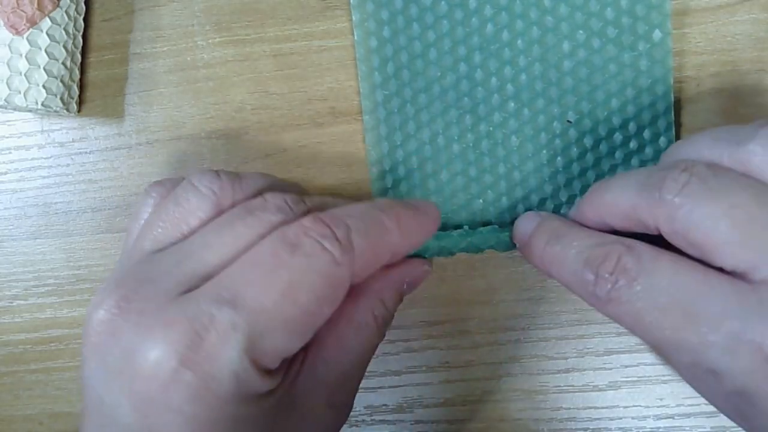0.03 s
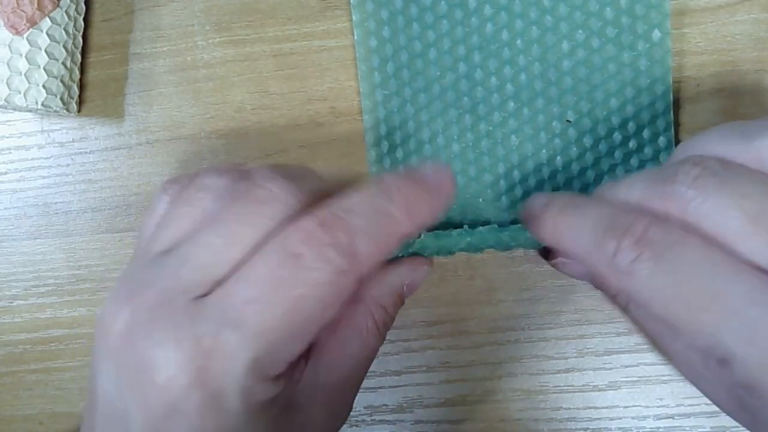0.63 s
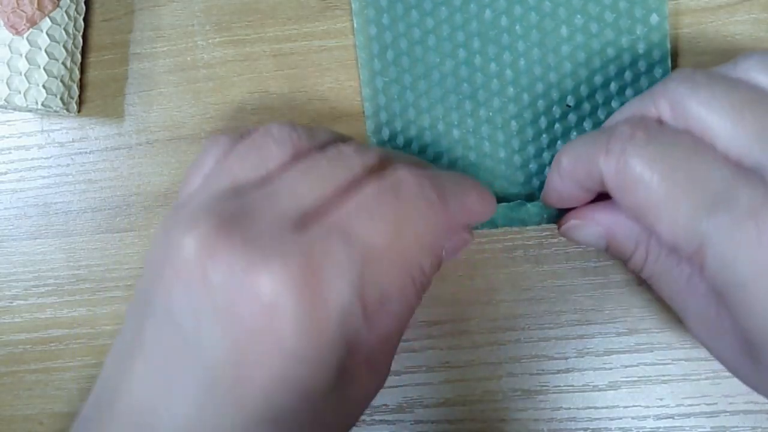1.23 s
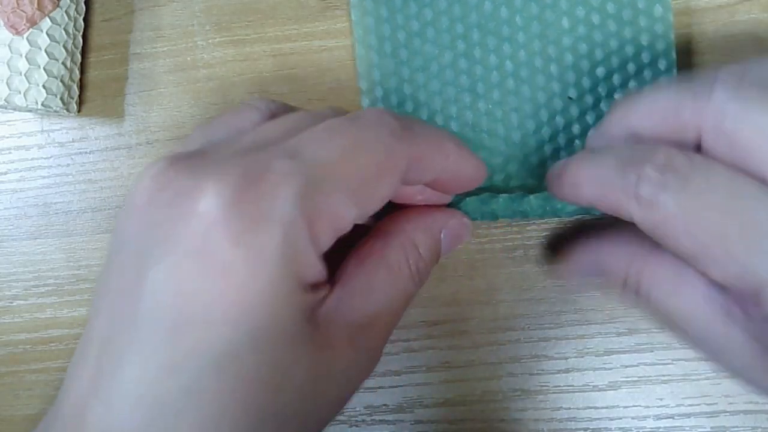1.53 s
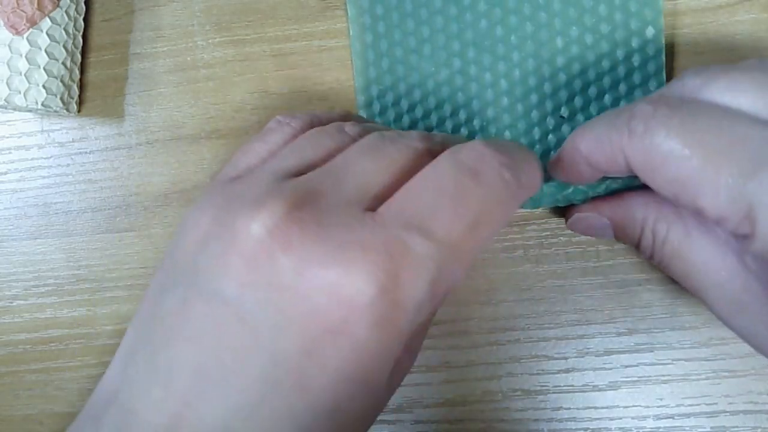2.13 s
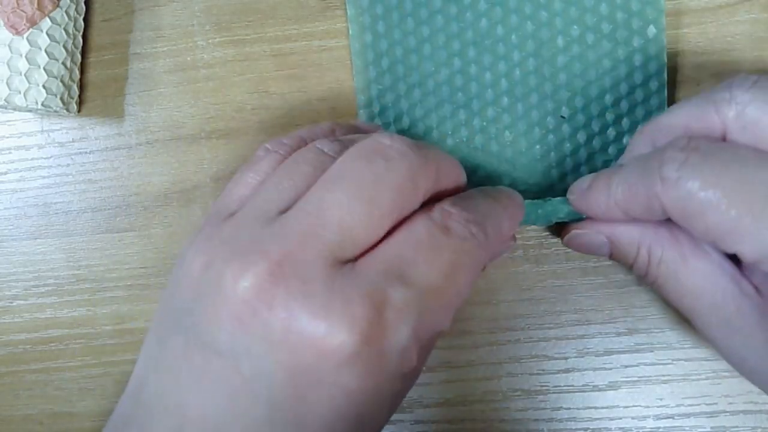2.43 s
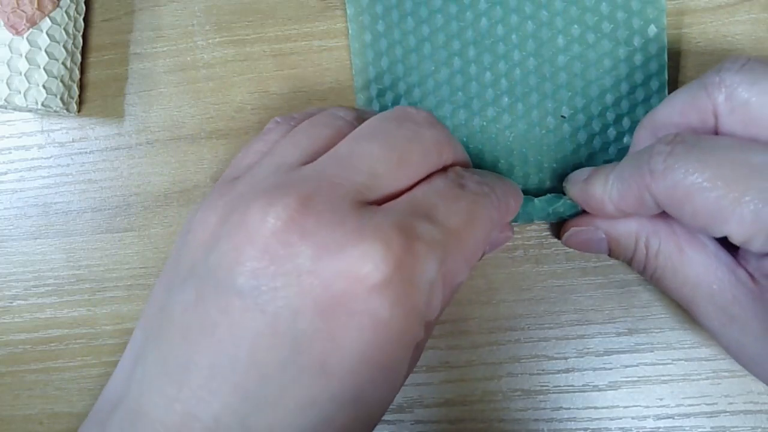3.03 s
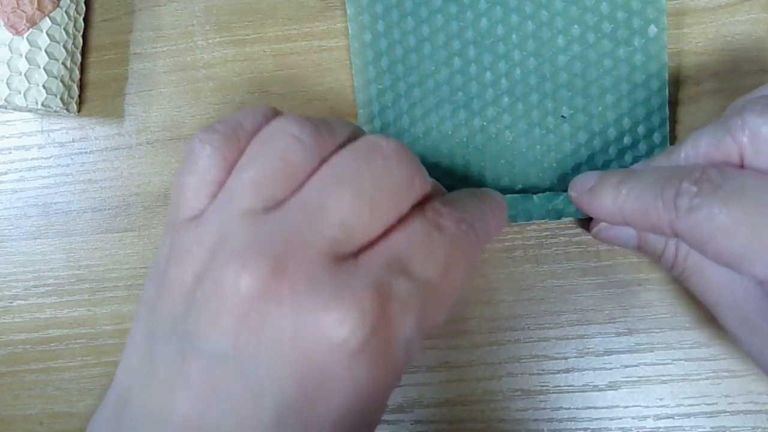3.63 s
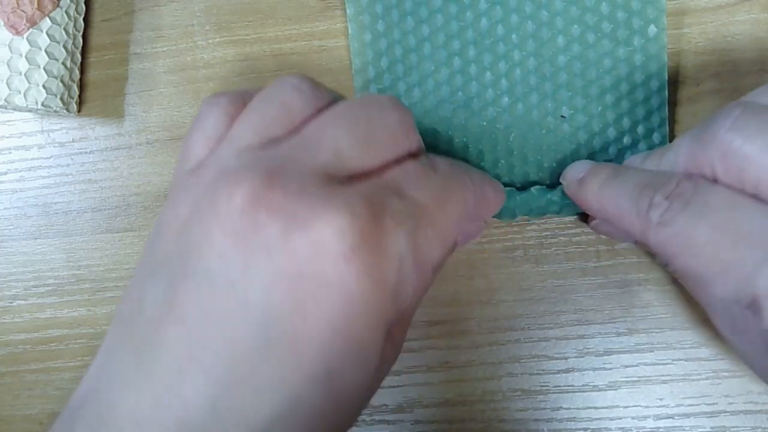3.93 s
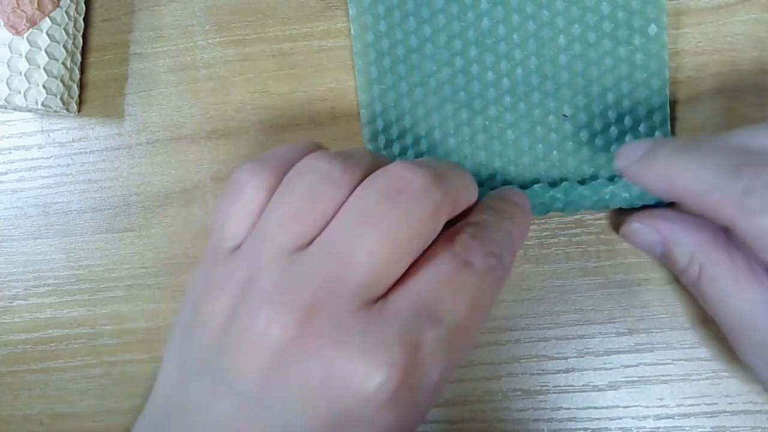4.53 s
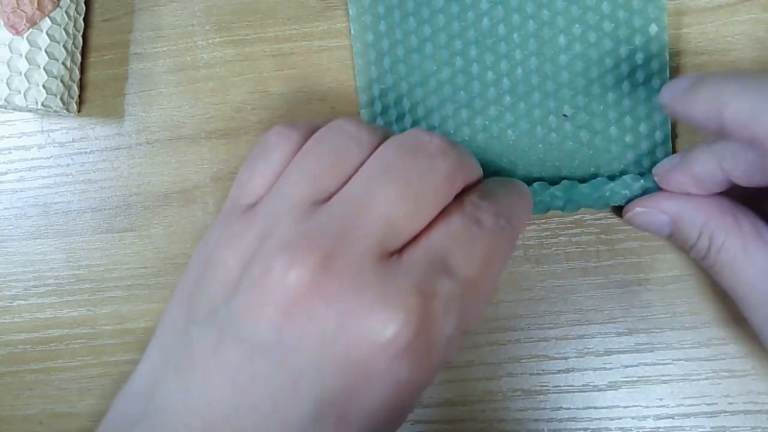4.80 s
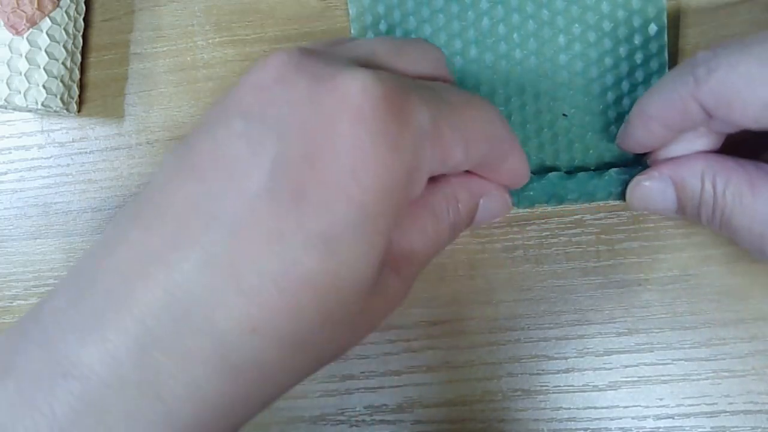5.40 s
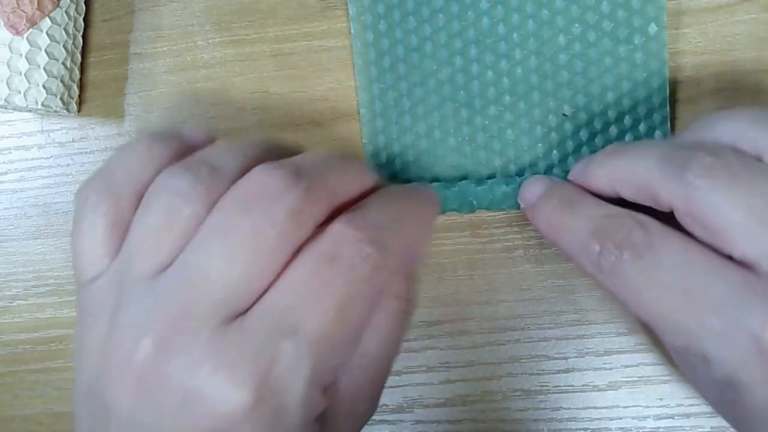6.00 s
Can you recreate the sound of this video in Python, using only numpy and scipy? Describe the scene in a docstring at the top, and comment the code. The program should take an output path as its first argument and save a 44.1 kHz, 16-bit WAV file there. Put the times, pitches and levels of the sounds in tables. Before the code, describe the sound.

A wax sheet crackles and clicks in short, close bursts as fingertips brush over it and lightly knock a wooden table.

```python
"""A honeycomb beeswax sheet crackles as fingers pinch it and roll it round a wick, close by.
Its wax cells give way in clusters of tiny sharp snaps. Fingertips brush over the sheet and bump
the wooden table, which booms faintly as the hands lean on it.
A small quiet room with a low rumble and a faint mains hum answers each snap."""
import sys
import numpy as np
from scipy import signal
from scipy.fft import rfft, irfft
from scipy.io import wavfile
from scipy.ndimage import uniform_filter1d

SR = 44100
rng = np.random.default_rng(int(sys.argv[2]) if len(sys.argv) > 2 else 0)


def persist_wave(psi):
    """Save psi, clipped to +-1, as 16-bit WAV."""
    counts = np.round(np.clip(psi, -1, 1) * 32767).astype(np.int16)
    wavfile.write(sys.argv[1], SR, np.atleast_2d(counts).T)


N = 275889


def gain_of(db):
    """Turns decibels into a number to multiply a sound by."""
    return 10 ** (np.asarray(db) / 20)


def evened(x):
    """Scales a sound to an average strength (rms) of 1."""
    return x / np.sqrt(np.mean(x ** 2) + 1e-20)


def read_curve(points, hz):
    """Reads between (frequency, value) points, with octaves evenly spaced."""
    point_hz, value = np.transpose(points)
    return np.interp(np.log(hz + 1), np.log(point_hz + 1), value)


def add(mix, start_s, sound):
    """Mixes a sound in at the given time."""
    part = mix[max(round(start_s * SR), 0):][:len(sound)]
    part += sound[:len(part)]


def colour(x, tone, tilt_db=0):
    """Gives a sound a tone curve, made brighter by tilt_db for each octave."""
    hz = np.fft.rfftfreq(len(x), 1 / SR)
    curve_db = read_curve(tone, hz) + tilt_db * np.log2(hz + 1)
    return evened(irfft(rfft(x) * gain_of(curve_db), len(x)))


def resonate(x, hz, width_hz):
    """Makes a sound ring at one pitch; a narrower width rings longer."""
    pole = np.exp((2j * np.pi * hz - np.pi * width_hz) / SR)
    return evened(signal.lfilter([1], [1, -pole], x).real)


def narrow_noise(n, hz, width_hz):
    """Noise held close to one pitch."""
    return resonate(resonate(rng.standard_normal(n), hz, width_hz), hz, width_hz)


def finger_hollow(x, depth_db, spacing_hz=260):
    """The gap under the fingers boosts some pitches and dulls others, anew with every grip."""
    spectrum = rfft(x)
    size = max(round(spacing_hz * len(x) / SR), 1)
    ripple = rng.standard_normal(len(spectrum))
    ripple = evened(uniform_filter1d(uniform_filter1d(ripple, size), size))
    return evened(irfft(spectrum * gain_of(depth_db * ripple), len(x)))


# The tone of the low rumble and faint hiss: frequency_hz, relative_db
BACKGROUND_TONE = [(15, -25.5), (30, -16.5), (50, -2.5), (80, -4.5), (130, -4), (160, -9.5), (300, -12),
                   (450, -21), (700, -25), (1200, -29), (3000, -34), (8000, -36.5), (10000, -33),
                   (16000, -36)]
# The notes in the mains hum: pitch_hz, level_db
HUM_NOTES = [(119, -75), (178, -81), (238, -80), (480, -85.5)]


def rumble_and_hum(noise_db=-67.5, waver=0.56, patchy_db=3.0, patchy_below_hz=7000):
    """Low rumble and faint hiss, flickering in random patches below 7 kHz, with a wavering hum."""
    hum, t = np.zeros(N), np.arange(N) / SR
    for hz, db in HUM_NOTES:
        wobble = waver * resonate(rng.standard_normal(N), hz, width_hz=4)
        hum += gain_of(db) * evened(np.sin(2 * np.pi * hz * t) + wobble)
    hz, _, bands = signal.stft(colour(rng.standard_normal(N), BACKGROUND_TONE), SR, nperseg=2048)
    patches = uniform_filter1d(rng.standard_normal(bands.shape), size=5, axis=0)  # smooth over pitch
    patches = evened(uniform_filter1d(patches, size=8, axis=1))  # and over time
    bands *= gain_of(patchy_db * patches / (1 + (hz[:, None] / patchy_below_hz) ** 4))
    noise = evened(signal.istft(bands, SR, nperseg=2048)[1][:N])
    return gain_of(noise_db) * noise + hum


# The hands' weight shifting on the table: middle_s, level_db (before halving), pitch_hz
THUDS = [(0.149, -60.5, 121), (0.741, -63, 301), (1.13, -58, 47), (1.588, -56.5, 106.4), (1.82, -58, 55),
         (2.37, -57.5, 76), (3, -62, 246), (3.3, -57.5, 56), (4.069, -56.5, 121.8), (5.78, -56.5, 116.5),
         (6.16, -60, 116)]


def table_thuds(length_s=0.14, width_hz=35):
    """The table top booms faintly as the hands lean and lift."""
    out, n = np.zeros(N), round(length_s * SR)
    for middle_s, db, hz in THUDS:
        boom = evened(narrow_noise(n, hz, width_hz) * np.hanning(n))
        add(out, middle_s - length_s / 2, gain_of(db) * boom / 2)
    return out


# The tones of a snap's ringing cell, shaken sheet and high fizz: frequency_hz, relative_db
CELL_TONE = [(2500, -30), (3700, -15), (4600, -4), (6000, -2.5), (7400, -5), (8400, -13), (10000, -38)]
SHEET_TONE = [(100, -26), (500, -21.5), (800, -10.5), (1100, -10.5), (1450, 2), (1850, -6), (2250, -2.5),
              (2900, -0.5), (3600, -2), (4500, -20.5)]
FIZZ_TONE = [(7000, -29.5), (8700, -1), (9600, 2.5), (10700, -2.5), (12000, 2.5), (13500, -3),
             (15000, -5.5), (16500, -12.5)]


def cell_snap(db, sheet_db, fizz_db, ring_hz, ring_share=0.41, usual_hz=6200):
    """A wax cell tears in a few milliseconds: it rings, fizzes on top and shakes the sheet."""
    t = np.arange(1024) / SR

    def burst(noise, fade_s, rise_s=.0005):
        """Swells and dies, with as much energy as 4 ms of sound at strength 1."""
        shaped = noise * np.minimum(t / rise_s, 1) ** 2 * np.exp(-(t / fade_s) ** 1.4)
        return shaped * np.sqrt(.004 * SR) / np.linalg.norm(shaped)

    cell, sheet, fizz = rng.standard_normal((3, len(t)))
    cell = (1 - ring_share) * cell + ring_share * resonate(cell, ring_hz, width_hz=1000)
    flake_tone = np.array(CELL_TONE) * [ring_hz / usual_hz, 1]  # a smaller flake rings higher
    cell = burst(colour(cell, flake_tone), fade_s=.0017)
    sheet = burst(finger_hollow(colour(sheet, SHEET_TONE), depth_db=5), fade_s=.0065)
    fizz = burst(colour(fizz, FIZZ_TONE), fade_s=.0017)
    return gain_of(db) * (cell + gain_of(sheet_db) * sheet + gain_of(fizz_db) * fizz)


def small_snap(db, sheet_db, fizz_db, near_hz=6400, scatter=.08):
    """A small cell snaps; its chance size sets its pitch."""
    return cell_snap(db, sheet_db, fizz_db, near_hz * (1 + scatter * rng.uniform(-1.2, 1)))


# The main wax cells giving way: start_s, level_db, sheet_relative_db, fizz_relative_db, pitch_hz
SNAPS = [(0.5664, -46, -13, -1.5, 7000), (0.5936, -26.5, -21.5, -3, 7600), (0.6498, -38, -19, -15, 6800),
         (.722, -46.5, -18.5, -2, 6230), (.9055, -56, -7.5, 2.5, 6000), (1.1876, -55.5, -14.5, 0, 6600),
         (1.3814, -45, -14, -3.5, 5960), (1.3933, -36, -10.5, -5, 6600), (1.448, -43, -11, -3, 6250),
         (1.4545, -36, -7, -7.5, 5500), (1.4573, -36, -6.5, -6, 7040), (1.487, -41.5, -26, -7, 6460),
         (1.5127, -50, -5.5, -6, 4820), (1.6192, -53.5, 10.5, -25, 4330), (1.6827, -49, 2.5, -7.5, 6200),
         (1.8723, -43, -2.5, -3, 6450), (1.8899, -37, -7, -6.5, 6460), (1.9044, -44, -7.5, -17, 6100),
         (2.303, -40.5, -13, -2.5, 6600), (2.3139, -33.5, -6.5, 3, 6700), (2.3241, -36, -11, -1, 6400),
         (2.3756, -32.5, -13.5, 1, 6100), (2.3847, -35, -12.5, -7, 6400), (2.4082, -48.5, -27, -4, 6000),
         (2.825, -50, -11, 4.5, 6360), (2.911, -40.5, -14.5, 1, 6200), (2.939, -42, -18.5, -1.5, 6400),
         (3.0257, -57.5, -19.5, 4, 6900), (3.0367, -60, -22, 3.5, 6470), (3.1568, -50, -22, 3.5, 6540),
         (3.1642, -37, -27, -10, 6650), (3.1927, -22, -33.5, -11.5, 6400), (3.2008, -31.5, -9, 3, 7600),
         (3.2177, -24, -26, -18.5, 6050), (3.2245, -27, -8.5, 0.5, 4780), (3.2429, -24, -26, -1, 6700),
         (3.4957, -56, -9.5, -1, 6300), (4.2244, -48.5, 5.5, 13, 6700), (4.228, -34, -16, 2, 6260),
         (4.259, -39.5, -16, 6, 6500), (4.3068, -38, -3.5, 2, 5850), (4.3167, -30, -3.5, 8, 5960),
         (4.3235, -31.5, -10, -1.5, 5860), (4.3343, -30, -9, 3.5, 6400), (4.3946, -48.5, -1.5, -2.5, 6400),
         (5.1334, -47.5, -18, 9, 7530), (5.5598, -65, -11, 6, 6250), (5.672, -58.5, 5.5, 6, 6200)]


def wax_snaps(crumb_db=-19.5, crumb_spread_db=9, crumb_lag_s=.012):
    """The pinched wax cracks; each crack is followed by four weaker, duller snaps beside it."""
    out = np.zeros(N)
    for start_s, db, sheet_db, fizz_db, hz in SNAPS:
        add(out, start_s, cell_snap(db, sheet_db, fizz_db, hz))
        for late, weak in rng.random((4, 2)):
            size_db = crumb_db - crumb_spread_db * (weak + late) / 2
            crumb = small_snap(db + size_db, sheet_db + 2, fizz_db - 2)
            add(out, start_s - crumb_lag_s * np.log(1 - late), crumb)
    return out


# How long the room's echo takes to fall by 60 dB: frequency_hz, fade_s
ECHO_FADES = [(150, .42), (700, 0.17), (2000, 0.2317), (6000, 0.205), (11000, 0.19), (16000, 0.15)]
# The tone of that echo: frequency_hz, level_db
ECHO_TONE = [(150, -5), (800, -6), (2000, -6), (4000, -6), (6800, -11.5), (8300, -10), (11000, -9.5),
             (16000, -14.5)]


def room_echo(x, first_s=0.0017, near_db=3, near_fade_s=0.028):
    """Sound bounces back, strongest from nearby things; each pitch range dies at its own speed."""
    t = np.arange(SR) / SR
    bounces = rng.standard_normal(SR) * (rng.random(SR) < 1 / 8) * (t > first_s)
    bounces *= 1 + gain_of(near_db) * np.exp(-t / near_fade_s)
    hz, age_s, bands = signal.stft(bounces, SR, nperseg=256)
    bands *= gain_of(-60 * age_s / read_curve(ECHO_FADES, hz)[:, None])
    tail = signal.istft(bands, SR, nperseg=256)[1][:SR]
    tone = gain_of(read_curve(ECHO_TONE, np.fft.rfftfreq(SR, 1 / SR)))
    tail = irfft(rfft(tail / np.linalg.norm(tail)) * tone)
    return signal.fftconvolve(x, tail[:SR // 2])[:N]


# The tone of a scuff on wood: frequency_hz, relative_db
SCUFF_TONE = [(60, -12), (200, -3.5), (400, -0.5), (800, 0), (1150, -6.5), (1600, -7), (2300, -6),
              (3000, -19), (6000, -25), (9000, -37), (15000, -51)]
# The notes the table top rings with: pitch_hz, relative_db, fade_s (to fall by 60 dB)
WOOD_NOTES = [(290, -6.5, 0.3), (409.5, 2, 0.11), (528, 1, 0.13), (703, -4.5, 0.044), (851.7, 5.5, 0.076),
              (1057, -8.5, 0.023), (1390, -7.5, 0.044), (2136, -8, 0.077)]
# Fingertips and the roll hitting the table: start_s, relative_db, decay_s, brightness_db_per_octave
BUMPS = [(.652, -56, 0.021, 1), (.866, -64, 0.032, -5), (1.621, -51.5, 0.01, 8.5), (1.684, -54, .007, 4.5),
         (1.878, -57.5, 0.027, -0.5), (2.316, -52.5, 0.024, -4), (3.226, -55.5, .058, -2.5),
         (4.226, -53, 0.035, 2.5), (4.318, -39, 0.022, 13.5), (4.393, -42, .013, 1),
         (4.431, -63, 0.016, 10), (5.134, -58, .02, 11), (5.641, -58.5, 0.049, -1),
         (5.666, -44.5, 0.0073, -1), (5.672, -50.5, .035, 5), (5.709, -42, .007, 3.5),
         (5.719, -43, 0.0039, 0)]


def table_bumps(rise_s=0.00053, overall_db=-2, ring_db=-3):
    """Soft knocks scuff the wooden top and set it ringing briefly."""
    out, t = np.zeros(N), np.arange(8192) / SR
    hz, note_db, fade_s = np.transpose(WOOD_NOTES)[:, :, None]
    for start_s, db, decay_s, tilt_db in BUMPS:
        scuff = colour(rng.standard_normal(len(t)), SCUFF_TONE, tilt_db)
        scuff = finger_hollow(scuff, depth_db=4) * np.exp(-t / decay_s)
        detune, phase = rng.random((2, len(hz), 1))
        notes = np.sin(2 * np.pi * (hz * (.95 + 0.095 * detune) * t + phase))
        notes *= gain_of(note_db + tilt_db * np.log2(hz))
        ring = (notes * gain_of(-60 * t / fade_s)).sum(0)
        ring *= gain_of(ring_db) * np.linalg.norm(scuff) / np.linalg.norm(ring)
        add(out, start_s, gain_of(db) * (scuff + ring) * np.minimum(t / rise_s, 1))
    return gain_of(overall_db) * out


# Pinches of the wax: start_s, end_s, level_db (a usual snap at full pressure), sheet_relative_db
PINCHES = [(.67, 0.708, -63, -24), (1.39, 1.416, -50.5, -12), (1.452, 1.52, -59, -4),
           (1.633, 1.682, -61, 6), (1.814, 1.829, -57, -7), (1.88, 1.944, -59.5, -1.5),
           (2.075, 2.116, -66, 3), (2.28, 2.44, -52.5, -7), (2.948, 2.99, -60, -29),
           (3.169, 3.19, -49, -26), (3.411, 3.54, -72.5, -18), (4.238, 4.305, -54, -4.5)]


def pinch_crackle(snaps_per_s=70, spread_db=3.5):
    """Small cells give way at uneven times while a pinch tightens and eases."""
    out = np.zeros(N)
    for start_s, end_s, db, sheet_db in PINCHES:
        count = max(round((end_s - start_s) * snaps_per_s), 1)
        for progress in (np.arange(count) + rng.random(count)) / count:
            pressure = np.sqrt(np.sin(np.pi * progress))
            snap = small_snap(db + spread_db * rng.standard_normal(), sheet_db, fizz_db=-1)
            add(out, start_s + progress * (end_s - start_s), pressure * snap)
    return out


def skin_squeak(n, hz, width_share=0.14, hollow_hz=840, hollow_db=-13):
    """Skin sticks and slips near one pitch; the hollow under the fingers adds a low scrape."""
    squeak = narrow_noise(n, hz, width_share * hz)
    scrape = narrow_noise(n, hollow_hz, width_share * hollow_hz)
    return evened(squeak + gain_of(hollow_db) * scrape)


# The tone of skin sliding on wax: frequency_hz, relative_db
SKIN_TONE = [(200, -11), (900, -7), (1200, -11), (1700, -4.5), (3300, -8), (4500, -7.5), (6900, -2),
             (8200, -8.5), (12000, -6), (16000, -19.5)]
# Finger strokes: start_s, end_s, relative_db, brightness_db_per_octave, squeak_relative_db, squeak_hz
RUBS = [(.843, 0.938, -71, -0.5, -7, 4000), (0.974, 1.136, -71, -1.5, -10, 6800),
        (1.485, 1.569, -68.5, -4.5, 0, 830), (1.569, 1.694, -60.5, -2, -3, 890),
        (1.817, 1.868, -60, -3, -7.5, 1500), (1.856, 1.925, -55.5, -2, -5.5, 784),
        (2.072, 2.146, -64.5, -1.5, -3.5, 1790), (2.815, 2.859, -60, 1.5, -7, 2100),
        (3.141, 3.278, -69, -2, 2, 850), (3.375, 3.6, -74.5, 4.5, -10, 6500),
        (3.98, 4.03, -72.5, -3, -6, 6800), (4.168, 4.25, -73, -4, 0, 1500),
        (4.276, 4.348, -59.5, -1, 1.5, 840), (5.115, 5.279, -62.5, 4.5, -11, 6700),
        (5.15, 5.52, -72, 7.5, -3.5, 6800), (5.538, 5.862, -66.5, 2.5, -13, 2400),
        (6.045, 6.081, -73, 0, 4.5, 3850), (6.165, 6.301, -66, -2, -12, 2400)]


def finger_rubs(slips_per_s=2500, spread_db=3, hiss=0.35, overall_db=-1):
    """Each stroke is a swell of tiny slips of uneven size over a smooth hiss, with a squeak."""
    out = np.zeros(N)
    for start_s, end_s, db, tilt_db, squeak_db, squeak_hz in RUBS:
        n = max(round((end_s - start_s) * SR), 256)
        slipping = rng.random(n) < slips_per_s / SR
        slips = slipping * gain_of(spread_db * np.minimum(rng.exponential(1, n), 4))
        friction = colour((slips + hiss) * rng.standard_normal(n), SKIN_TONE, tilt_db)
        stroke = finger_hollow(friction, depth_db=4) + gain_of(squeak_db) * skin_squeak(n, squeak_hz)
        swell = np.sin(np.linspace(0, np.pi, n))
        add(out, start_s, gain_of(db) * stroke * swell)
    return gain_of(overall_db) * out


def scene():
    """Wax and fingers with their echo, over the table's thuds and a low rumble and hum."""
    hands = wax_snaps() + table_bumps() + finger_rubs() + pinch_crackle()
    return (hands + room_echo(hands) + table_thuds() + rumble_and_hum())[None]


def record(dry):
    """Cuts away the very highest treble."""
    treble_cut = signal.firwin(255, cutoff=16400, window=("kaiser", 8), fs=SR)
    return signal.oaconvolve(dry, treble_cut[None], "same")


dry = scene()
out = record(dry)
persist_wave(out)
```